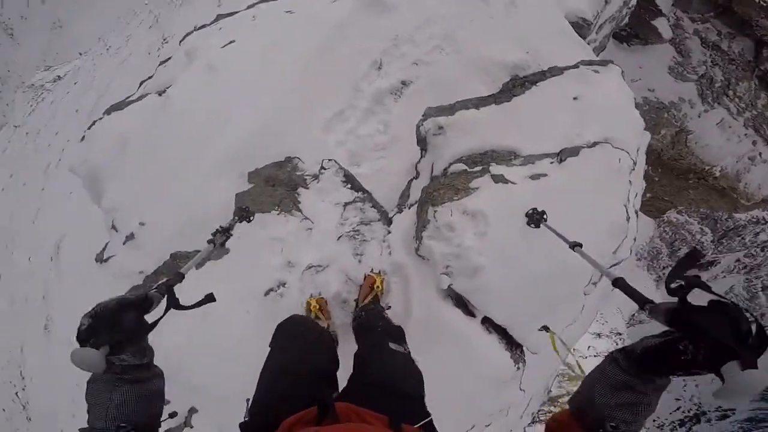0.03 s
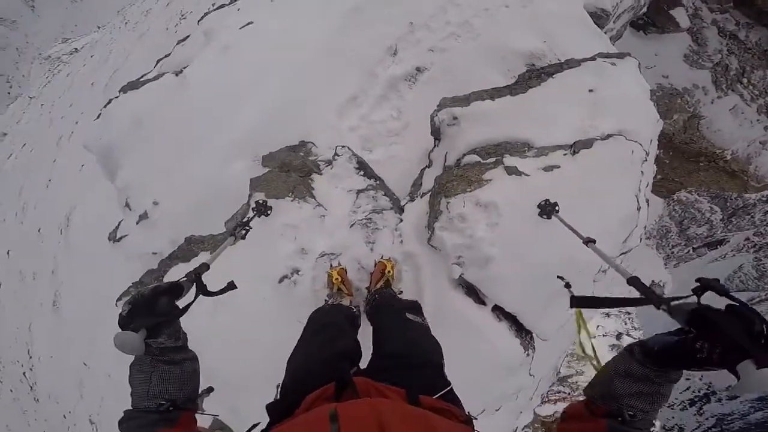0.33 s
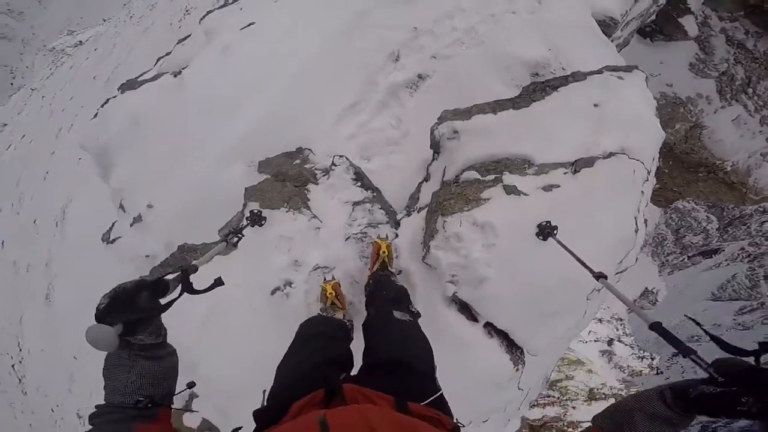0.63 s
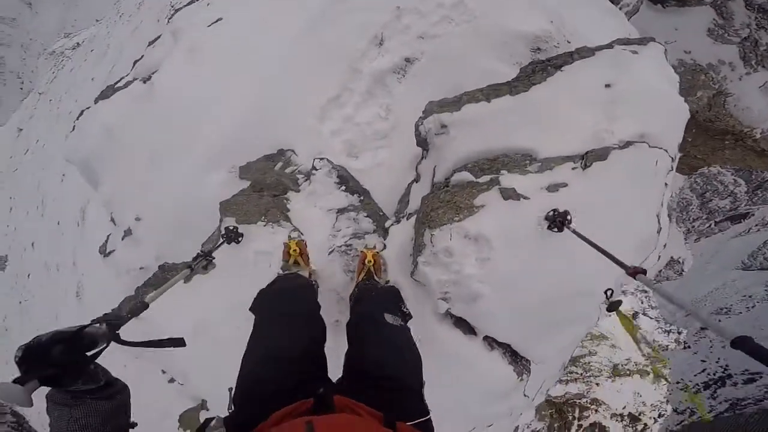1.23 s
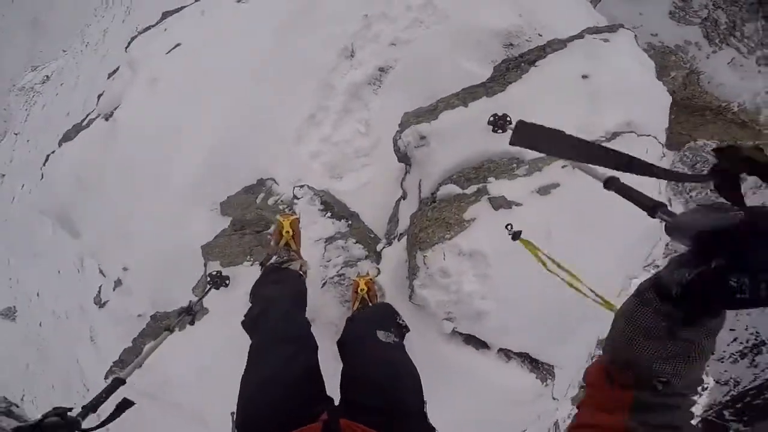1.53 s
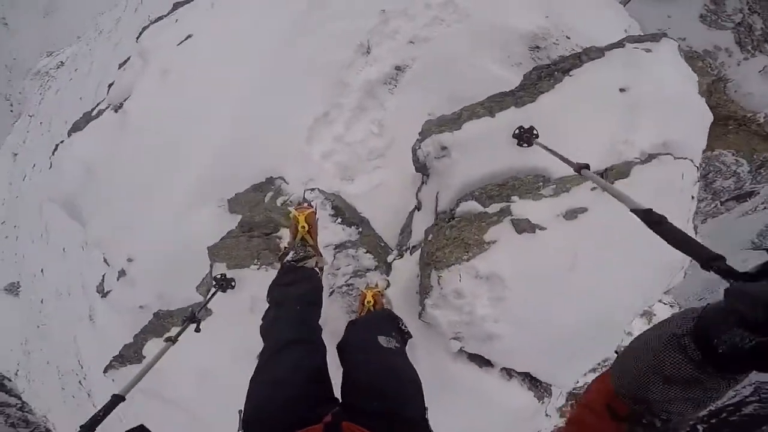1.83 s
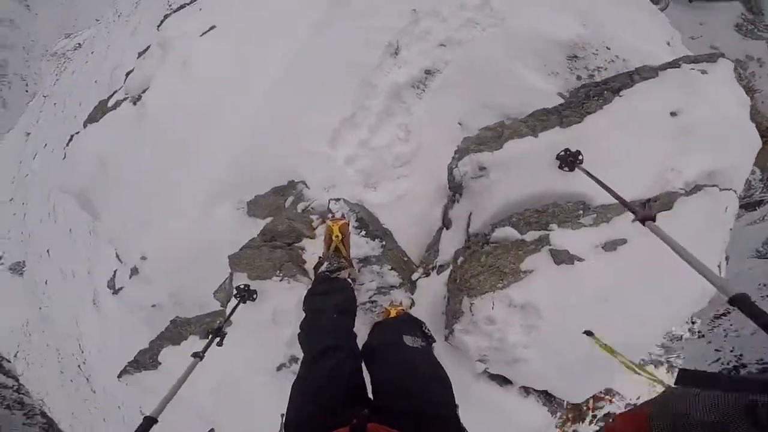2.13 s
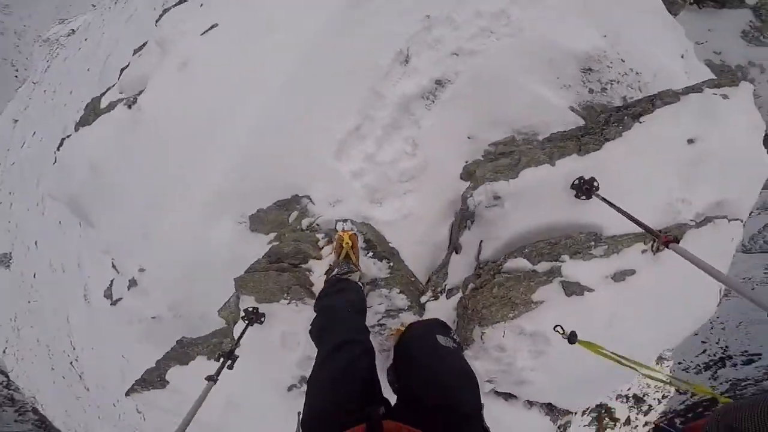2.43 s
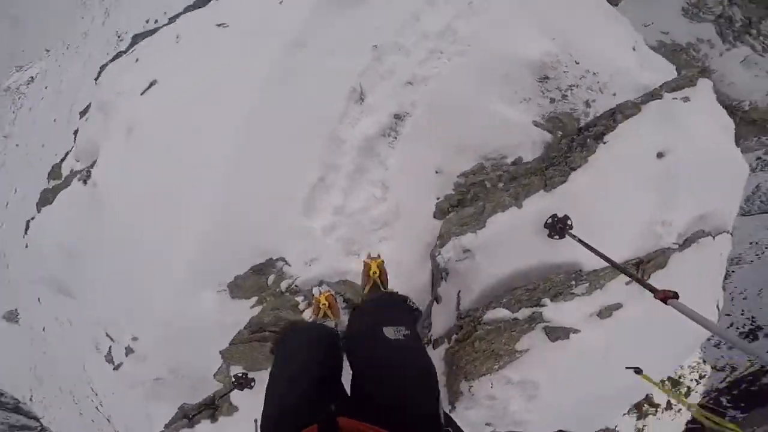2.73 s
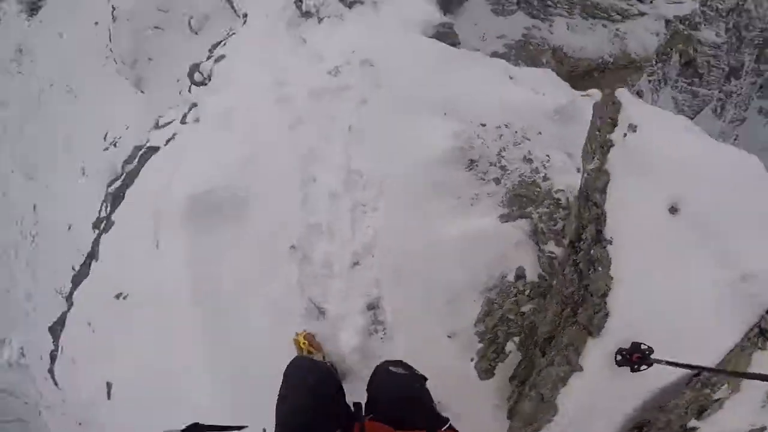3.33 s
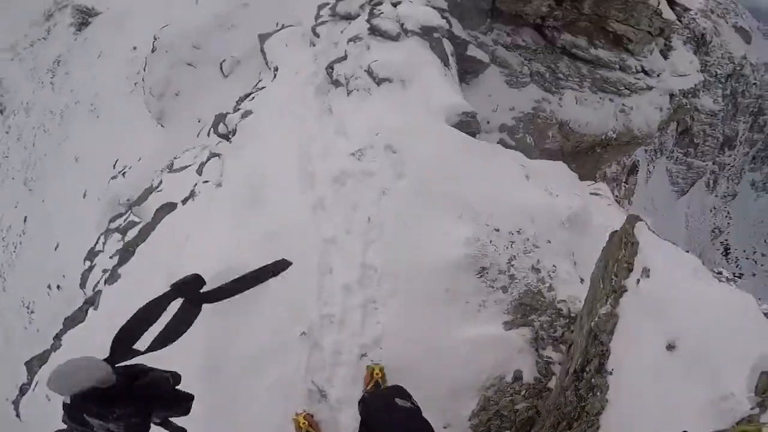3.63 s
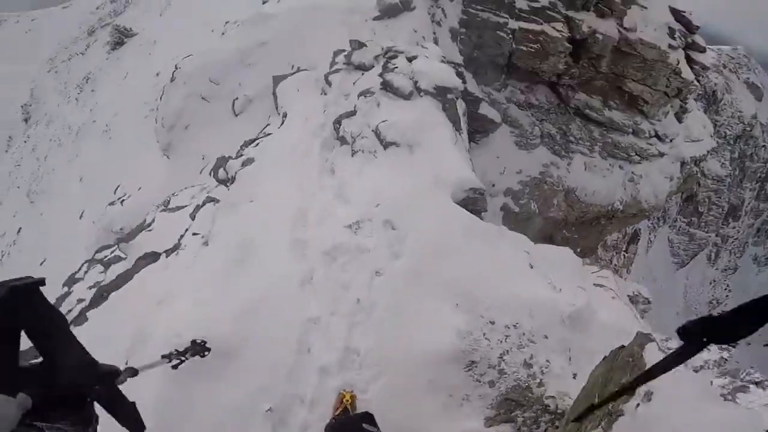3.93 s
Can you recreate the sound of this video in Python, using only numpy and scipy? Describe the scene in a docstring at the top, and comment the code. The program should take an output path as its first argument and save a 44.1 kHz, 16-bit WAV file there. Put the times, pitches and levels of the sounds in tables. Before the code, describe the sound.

A quick, loud flurry of knocks and rubs on the microphone's plastic casing, probably from a pole strap, comes at about 3.1 to 3.4 seconds. Before it, light wind buffets the microphone over a soft wash of mountain air, with faint, short crampon scuffs on rock and hard snow and a few metal chinks. Two more scuffs and some chinks follow, with a stronger gust from 3.8 seconds.

```python
"""Light wind buffets the microphone on a ridge, over a steady wash of mountain air. From the start a
climber's crampons scuff rock and hard snow in short bursts of friction, and metal gear chinks faintly.
After three seconds something, probably a pole strap, rubs along the plastic case of the camera the
climber wears and knocks on it in a quick, loud flurry that rings the shell and its mount. The gain
ducks after the loud blows; last come two more scuffs, a few chinks and a stronger gust."""
import sys
import numpy as np
from scipy import signal
from scipy.fft import rfft, irfft
from scipy.io import wavfile

SR = 44100
rng = np.random.default_rng(int(sys.argv[2]) if len(sys.argv) > 2 else 0)


def log_audio(samples):
    """Write samples as a 16-bit WAV file to the path given in sys.argv[1]."""
    # one column per channel
    frames = np.atleast_2d(samples).T
    # limit to full scale, then quantise
    limited = np.clip(frames, -1, 1)
    pcm = np.round(limited * 32767).astype(np.int16)
    wavfile.write(sys.argv[1], SR, pcm)


N = 176400
TIME = np.arange(N) / SR


# Blows on the case: start_s, clack_db, clack_hz, thud_db, hum_db, tick_db, push_db
CASE_BLOWS = [(3.0966, -17.5, 1770, -25.5, -27, -18.5, -33), (3.1308, -6, 1620, -4.5, -11.5, -20.5, -37),
              (3.1484, -2.5, 1653, 4, -16.5, -18, 1.5), (3.1614, -17.5, 1880, -36, -14.5, -38, -51),
              (3.1960, -8.5, 1865, 5, -13.5, -19.5, -6), (3.2548, -7.5, 1916, -22, -23, -21, -27),
              (3.3104, -29, 1760, -36, -60, -30.5, -22), (3.3363, -40, 1620, -20.5, -38.5, -68, -23),
              (3.3995, -28.5, 1750, -22.5, -36.5, -52, -18.5)]
# Modes of the plastic shell: pitch_hz, level_db, t60_s
SHELL_MODES = [(1310, -22, 0.024), (1520, -22, .018), (1680, -24, .014), (1900, -8, 0.019),
               (4210, -31, 0.025), (5120, -47, 0.084), (5650, -36, .015)]
# Modes of the mount: pitch_hz, level_db, t60_s
MOUNT_MODES = [(170, -1, 0.067), (195.3, -0.5, 0.27), (447, -18, 0.064), (672, -10.5, 0.029)]

def knock(clack_db, clack_hz, thud_db, hum_db, tick_db, push_db):
    """Impact excitation: a blow rings the modes of shell and mount and gives the air a slow push."""
    t = np.arange(SR // 3) / SR
    shell_rise_s, mount_rise_s = 0.00125, 0.0018
    clack = amp(clack_db) * (pulse(t, clack_hz, shell_rise_s) + ring(t, SHELL_MODES, shell_rise_s))
    thud = amp(thud_db) * pulse(t, hz=310, rise_s=mount_rise_s)
    hum = amp(hum_db) * ring(t, MOUNT_MODES, mount_rise_s)
    push = amp(push_db) * pulse(t, hz=25.8, rise_s=0.013)
    return amp(tick_db) * contact_tick(t) - (clack + thud + hum + push)


# Spectrum of ticks and grit on the case: frequency_hz, level_db
PLASTIC_SPECTRUM = [(300, -30), (1000, -0.5), (2000, 16), (2550, -11), (3250, 3.5), (3850, -4), (4250, 5),
                    (4650, 0), (5050, -8.5), (5650, 0), (6300, -21), (6950, -13.5), (7700, -28),
                    (9200, -24), (15000, -49)]

def contact_tick(t):
    """A brief contact has a broad spectrum: a burst of noise coloured by the case."""
    fade = np.minimum(t / 0.0006, 1) * decay(t, t60_s=0.02)
    burst = rng.standard_normal(len(t)) * fade
    return unit(colour_burst(burst, PLASTIC_SPECTRUM)) * rms(fade)


# Strap rubbing the case: start_s, length_s, body_db, body_hz, width_hz, grit_db
STRAP_RUBS = [(3.067, 0.032, -43, 1730, 900, -55), (3.075, 0.022, -33, 2170, 380, -39.5),
              (3.104, 0.071, -56, 1670, 790, -51), (3.127, 0.035, -33, 1570, 600, -59),
              (3.165, 0.075, -49, 1600, 890, -59), (3.237, 0.03, -41, 1380, 800, -57),
              (3.265, 0.094, -51, 1730, 690, -56), (3.321, 0.023, -45.5, 1730, 700, -56),
              (3.365, 0.078, -56.5, 1770, 696, -68)]

def rub(length_s, body_db, body_hz, width_hz, grit_db, grit_spectrum=PLASTIC_SPECTRUM):
    """Stick-slip friction: a swell of tiny slips drives a hollow resonance, with bright grit on top."""
    t = np.arange(SR // 5) / SR
    grains_per_s, grain_db = 2500, 4
    swell = np.sin(np.pi * np.minimum(t / length_s, 1) ** 0.65)
    slipping = rng.random(len(t)) < grains_per_s / SR
    strength = amp(grain_db * np.minimum(rng.exponential(1, len(t)), 3))
    slips = rng.standard_normal(len(t)) * (slipping * strength + 0.32) * swell
    body = signal.fftconvolve(slips, resonance(t, body_hz, width_hz))[:len(t)]
    grit = colour_burst(slips, grit_spectrum)
    return (amp(body_db) * unit(body) + amp(grit_db) * unit(grit)) * rms(swell)


# Spikes scuffing rock and hard snow: start_s, length_s, body_db, body_hz, grit_db
CRAMPON_SCUFFS = [(.129, 0.0087, -44.5, 1700, -55), (.267, 0.015, -54, 1770, -65.5),
                  (.747, 0.026, -58.5, 1450, -74), (.772, 0.024, -56, 1900, -63.5),
                  (.79, 0.01, -58, 1750, -70), (.833, 0.0079, -68, 1700, -73),
                  (1.241, 0.0062, -66, 1800, -61.5), (1.531, .009, -55, 1580, -66),
                  (1.548, 0.012, -42.5, 1720, -45), (1.555, 0.013, -49.5, 2010, -58),
                  (1.566, 0.026, -68, 1800, -63), (1.597, .008, -69, 1900, -65),
                  (1.638, 0.0075, -57.5, 1920, -56), (1.68, .008, -74, 1900, -64),
                  (1.722, 0.0073, -71, 1900, -66), (2.238, 0.0093, -63, 1770, -69),
                  (2.53, 0.027, -62, 1700, -70), (2.808, 0.018, -60.5, 1660, -65),
                  (3.752, 0.013, -48, 1520, -57.5), (3.954, .009, -65, 1700, -65)]
# Spectrum of steel spikes on stone: frequency_hz, level_db
SPIKE_SPECTRUM = [(300, -22), (750, -17), (1200, 2.5), (2100, -5), (2500, 4), (2850, 1), (3100, -19),
                  (3500, 9), (3950, -8), (4500, 2), (5200, 1), (5900, -0.5), (6800, -15), (12000, -25)]

def scuff(length_s, body_db, body_hz, grit_db):
    """Stick-slip friction again, its grit coloured by steel on stone."""
    return rub(length_s, body_db, body_hz, width_hz=700, grit_db=grit_db, grit_spectrum=SPIKE_SPECTRUM)


# Small metal gear touching: start_s, level_db, pitch_hz
GEAR_CHINKS = [(.018, -56, 4350), (.035, -58, 4760), (.132, -52, 4410), (.151, -55, 4560),
               (.183, -57, 4620), (3.129, -36, 4600), (3.139, -43, 4850), (3.16, -45, 4900),
               (3.236, -44, 4500), (3.241, -48, 4600), (3.419, -52, 4400), (3.646, -59, 4700),
               (3.754, -47.5, 4440), (3.873, -57, 4500), (3.889, -60, 4600), (3.956, -65, 4620)]

def chink(level_db, pitch_hz):
    """Random excitation of a resonance: metal parts chatter briefly against each other and ring."""
    t = np.arange(SR // 8) / SR
    metal = resonance(t, pitch_hz, width_hz=650)
    chatter = irfft(rfft(rng.standard_normal(len(t))) * rfft(metal), len(t))
    fade = np.minimum(t / 0.003, 1) * decay(t, t60_s=0.035)
    return amp(level_db) * unit(chatter) * fade


# Strength of the gusts: time_s, level_db
GUST_LEVELS = [(0, -24.5), (.03, -46), (.14, -44), (.27, -47), (.295, -32), (.325, -31), (.36, -38),
               (.52, -42.5), (.62, -48), (.69, -36.5), (.75, -51), (.8, -36.5), (1.0, -48.5), (1.4, -58.5),
               (1.6, -49.5), (1.85, -58.5), (2.45, -63), (2.78, -52), (2.85, -43), (2.95, -42),
               (3.02, -38.5), (3.065, -50), (3.09, -10.5), (3.12, -11.5), (3.17, -29), (3.3, -27.5),
               (3.5, -36.5), (3.63, -43.5), (3.77, -39.5), (3.81, -22), (3.9, -20), (3.95, -28.5),
               (4, -23.5)]
# Spectrum of the eddies that drive the buffeting: frequency_hz, level_db
EDDY_SPECTRUM = [(8, -4), (20, -6.5), (32, -5), (50, -16), (80, -22.5), (130, -35), (300, -62),
                 (1000, -114)]

def wind():
    """Turbulent pressure at the microphone: deep, lumpy buffeting whose strength follows the gusts."""
    eddies = signal.hilbert(colour(rng.standard_normal(N), EDDY_SPECTRUM))
    evened = eddies.real / (unit(abs(eddies)) + 1.04)  # partly flattens the random envelope
    rumble = colour(evened, [(60, -13), (110, -15), (250, -33), (1000, -88)])
    return unit(rumble) * amp(np.interp(TIME, *np.transpose(GUST_LEVELS)))


# Spectrum of the mountain air: frequency_hz, level_db
AIR_SPECTRUM = [(24, -18), (45, -7), (85, -16.5), (108, -11.5), (145, 0), (200, 0), (280, -7), (400, -10),
                (620, -14.5), (950, -18), (1600, -20.5), (2150, -24), (2700, -29), (3400, -34),
                (4600, -30.5), (5800, -31), (7000, -33.5), (8300, -29), (9600, -27.5), (11200, -33),
                (13000, -37), (15000, -42)]
# Strength of its low and high bands: time_s, wash_db, hiss_db
AIR_BAND_LEVELS = [(0, -52.5, -66), (.8, -53, -66), (1.2, -53, -66), (2.05, -53.5, -66.5),
                   (2.3, -56.5, -70), (2.65, -57.5, -70), (3.0, -53, -65.5), (3.5, -52.5, -66),
                   (4, -51.5, -65)]

def air(split_hz=2630):
    """Broadband flow noise: a soft wash of wind over the ridge and a thin hiss both sink in a lull."""
    time_s, wash_db, hiss_db = np.transpose(AIR_BAND_LEVELS)
    mix = np.zeros(N)
    for side, level_db in (("low", wash_db), ("high", hiss_db)):
        crossover = signal.butter(4, split_hz, side, fs=SR, output="sos")
        band = signal.sosfilt(crossover, colour(rng.standard_normal(N), AIR_SPECTRUM))
        mix += unit(band) * amp(np.interp(TIME, time_s, level_db))
    return mix


def ring(t, modes, rise_s):
    """Modal superposition: damped sines build up together and die away at their own rates."""
    partials = sum(amp(db) * decay(t, t60_s) * np.sin(2 * np.pi * hz * t) for hz, db, t60_s in modes)
    return partials * (1 - np.exp(-t / rise_s))


def pulse(t, hz, rise_s):
    """Heavily damped oscillation whose envelope peaks at rise_s."""
    return (t / rise_s) ** 2 * np.exp(2 * (1 - t / rise_s)) * np.sin(2 * np.pi * hz * t)


def resonance(t, hz, width_hz):
    """Impulse response of a resonance: the wider its band, the sooner it dies."""
    return t * np.exp(-np.pi * width_hz * t) * np.sin(2 * np.pi * hz * t)


def decay(t, t60_s):
    """Exponential damping by 60 dB in t60_s."""
    return np.exp(-np.log(1000) * t / t60_s)


def colour(x, spectrum):
    """Spectral shaping by (frequency_hz, level_db) points on a logarithmic frequency axis."""
    frequency_hz, level_db = np.transpose(spectrum)
    bins_hz = np.fft.rfftfreq(len(x), 1 / SR)
    gain = amp(np.interp(np.log(bins_hz + 1), np.log(frequency_hz + 1), level_db))
    return irfft(rfft(x) * gain, len(x))


def colour_burst(x, spectrum):
    """Spectral shaping, zero-padded so that the burst does not wrap around."""
    return colour(np.pad(x, (0, len(x))), spectrum)[:len(x)]


def amp(db):
    """Decibels to gain."""
    return 10 ** (np.asarray(db) / 20)


def rms(x):
    """Root-mean-square amplitude."""
    return np.sqrt(np.mean(x ** 2) + 1e-20)


def unit(x):
    """Normalisation to rms 1."""
    return x / rms(x)


def scene():
    """Superposition: each knock, rub, scuff and chink adds to the wind and air at its start time."""
    mix = wind() + air()
    sources = (CASE_BLOWS, knock), (STRAP_RUBS, rub), (CRAMPON_SCUFFS, scuff), (GEAR_CHINKS, chink)
    for events, source in sources:
        for start_s, *settings in events:
            sound = source(*settings)
            span = mix[round(start_s * SR):][:len(sound)]
            span += sound[:len(span)]
    return mix[None]


def record(dry):
    """Automatic gain control ducks after loud blows; the hardest saturates, and the band is limited."""
    threshold_db, duck_share, recovery_db_per_s, sense_s = -16, 0.49, 113, 0.0084
    memory = np.exp(-1 / (sense_s * SR))
    power_db = 10 * np.log10(signal.lfilter([1 - memory], [1, -memory], dry[0] ** 2) + 1e-12)
    fall_db = TIME * recovery_db_per_s
    held_db = np.maximum.accumulate(power_db + fall_db) - fall_db  # each peak sinks at a steady rate
    ducked = dry * amp(-duck_share * np.maximum(held_db - threshold_db, 0))
    saturated = ducked / (1 + ducked ** 6) ** (1 / 6)  # soft knee at full scale
    lowpass = signal.firwin(511, cutoff=15300, window=("kaiser", 9), fs=SR)
    return signal.oaconvolve(saturated, lowpass[None], "same")


dry = scene()
out = record(dry)
log_audio(out)
```